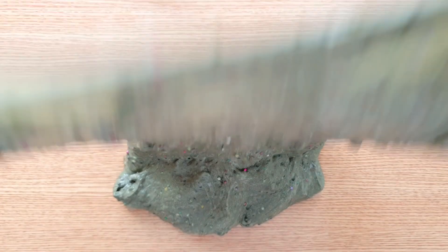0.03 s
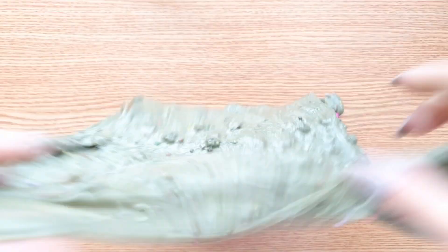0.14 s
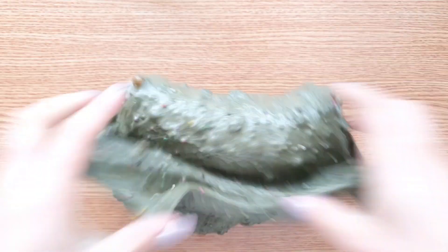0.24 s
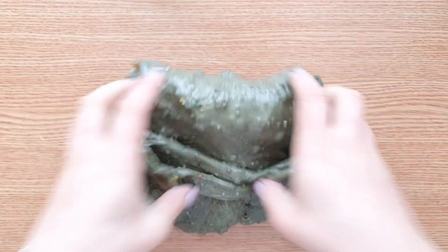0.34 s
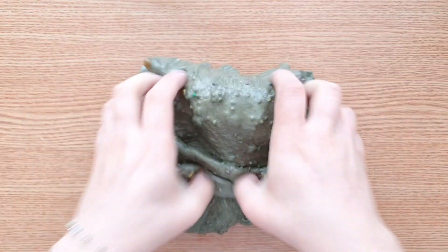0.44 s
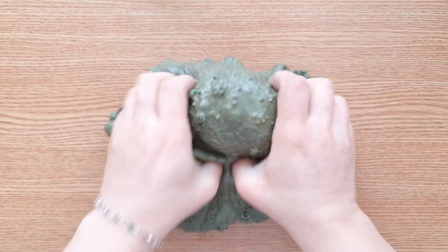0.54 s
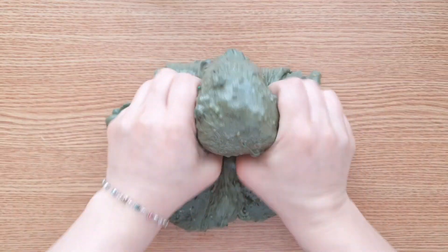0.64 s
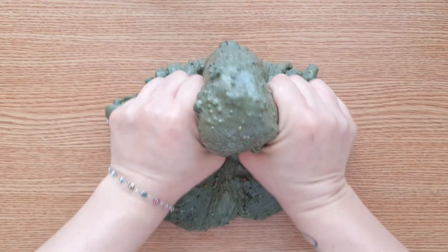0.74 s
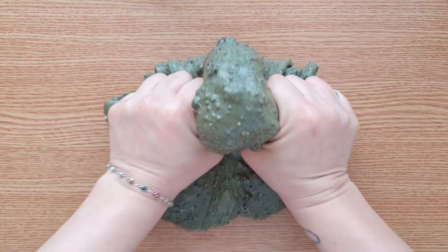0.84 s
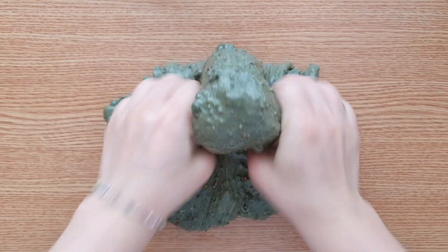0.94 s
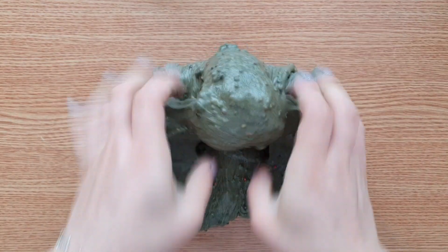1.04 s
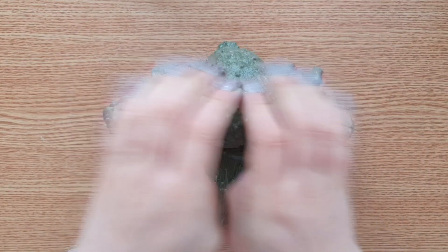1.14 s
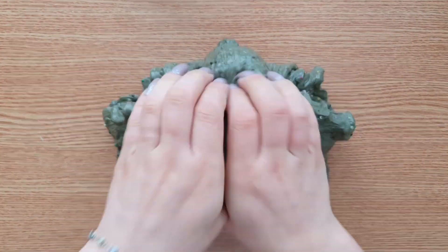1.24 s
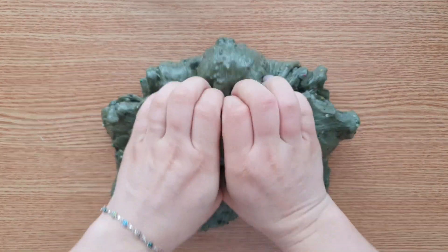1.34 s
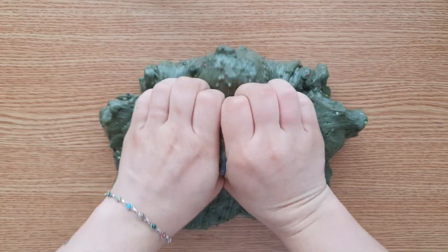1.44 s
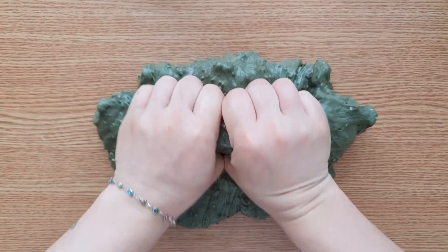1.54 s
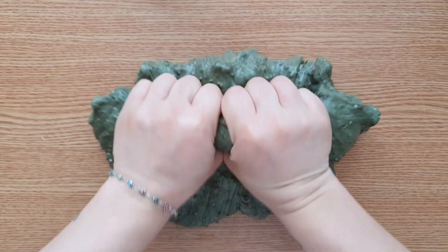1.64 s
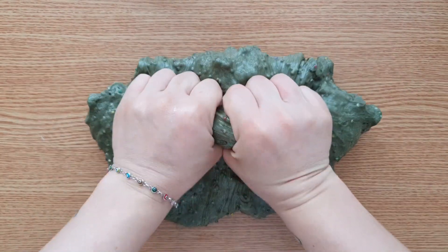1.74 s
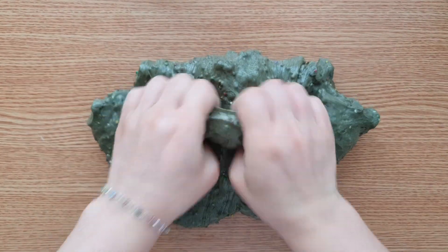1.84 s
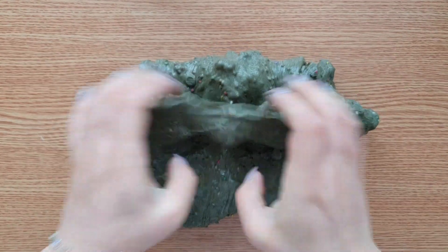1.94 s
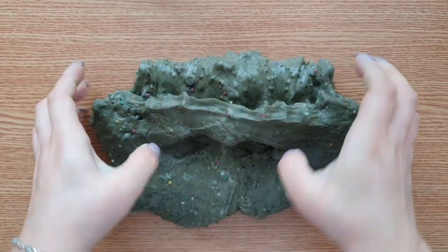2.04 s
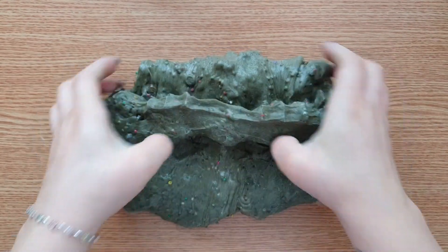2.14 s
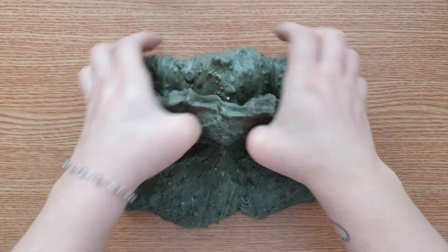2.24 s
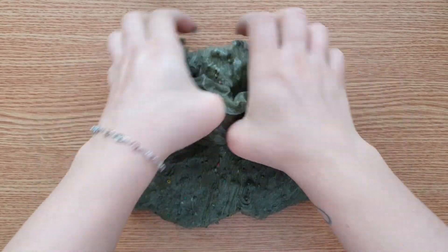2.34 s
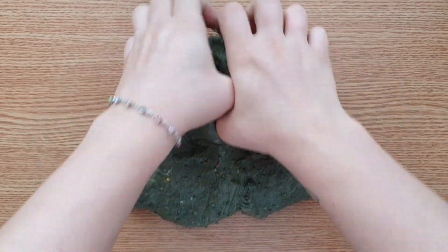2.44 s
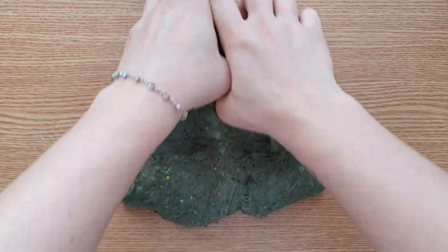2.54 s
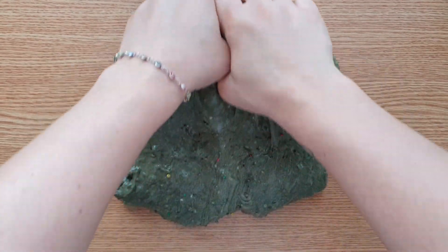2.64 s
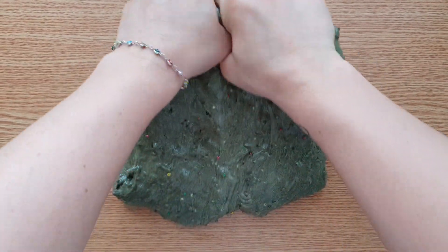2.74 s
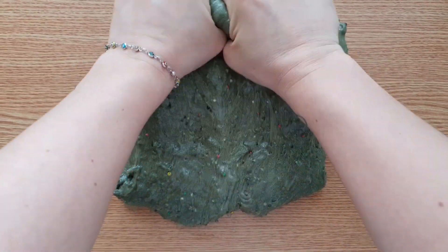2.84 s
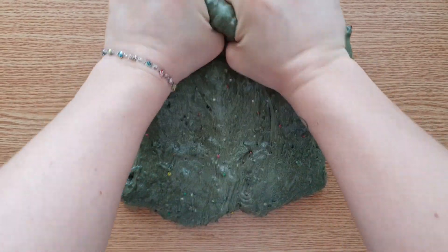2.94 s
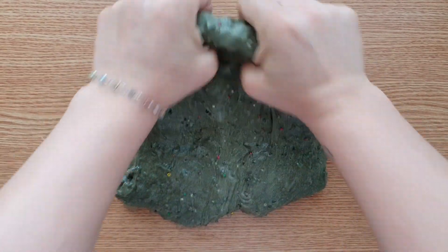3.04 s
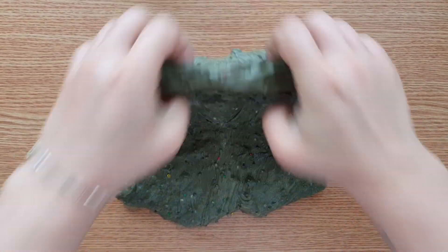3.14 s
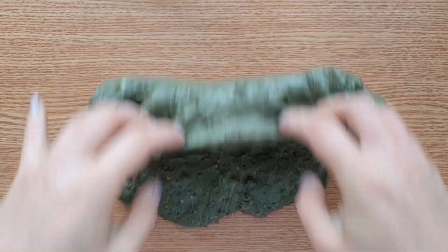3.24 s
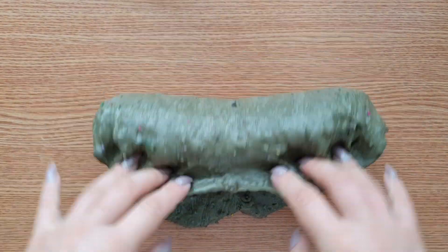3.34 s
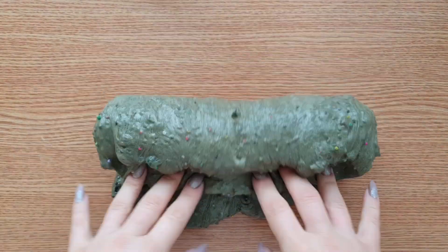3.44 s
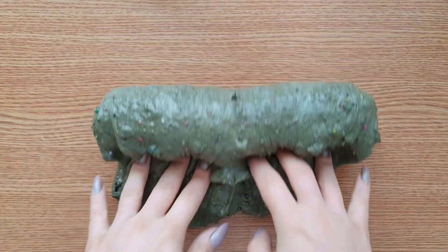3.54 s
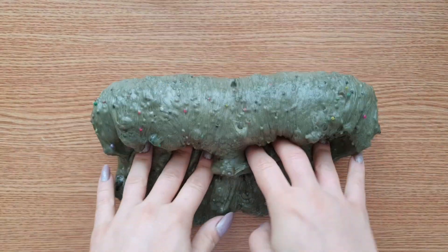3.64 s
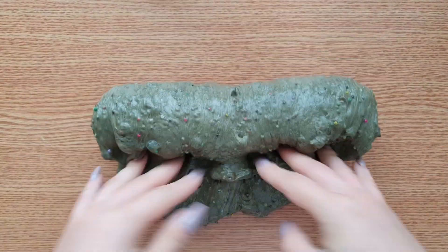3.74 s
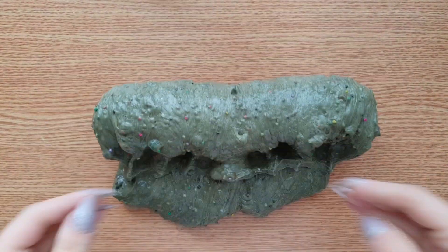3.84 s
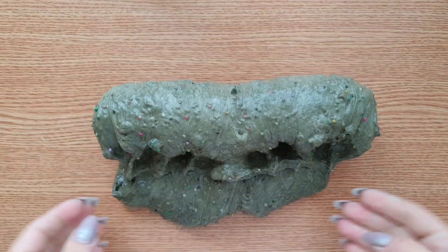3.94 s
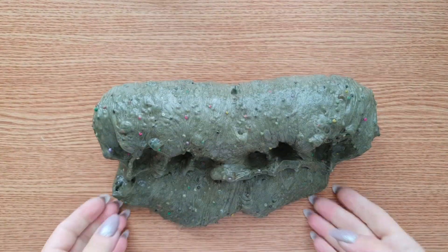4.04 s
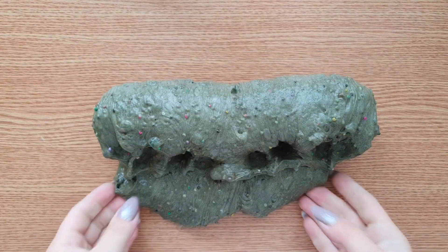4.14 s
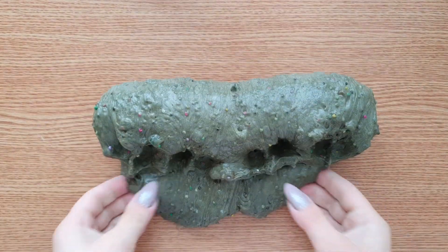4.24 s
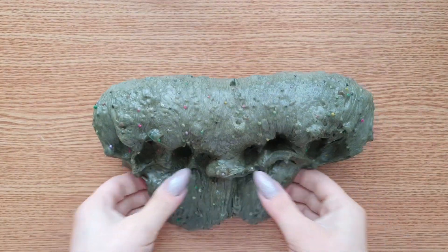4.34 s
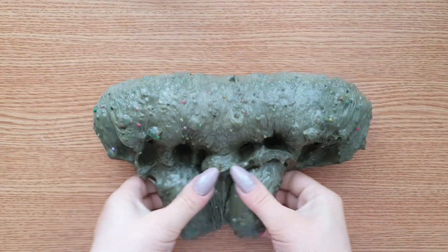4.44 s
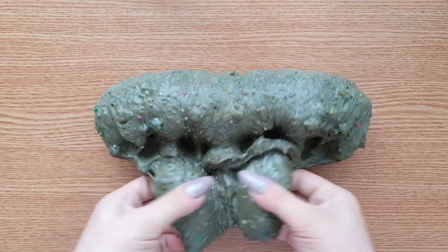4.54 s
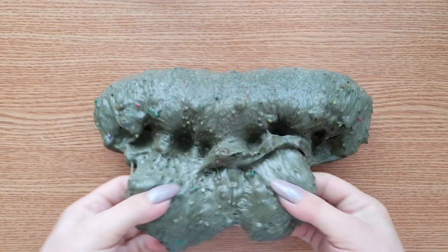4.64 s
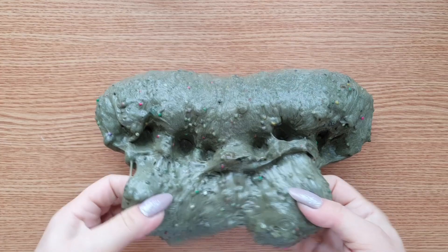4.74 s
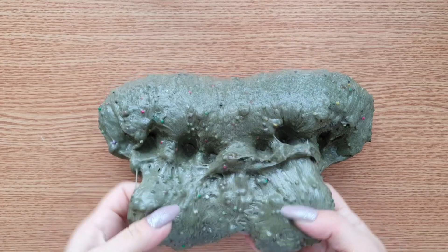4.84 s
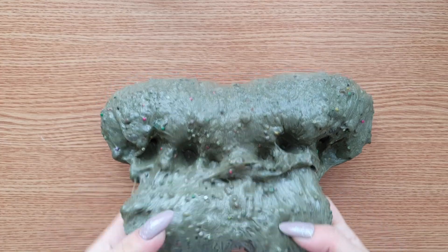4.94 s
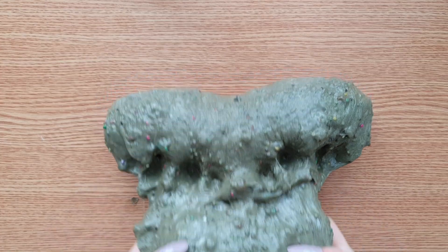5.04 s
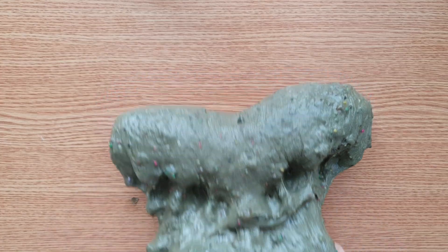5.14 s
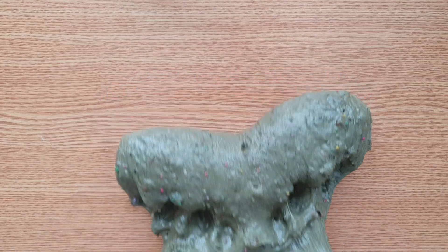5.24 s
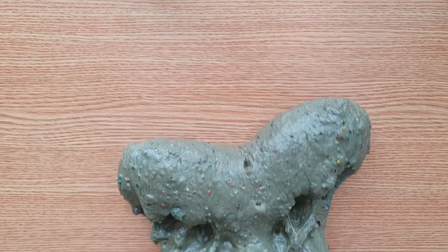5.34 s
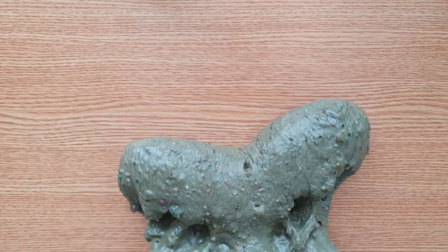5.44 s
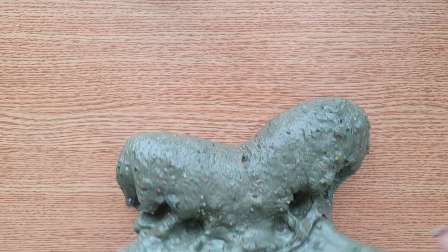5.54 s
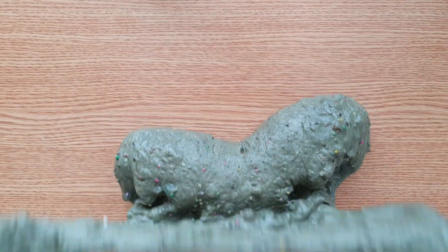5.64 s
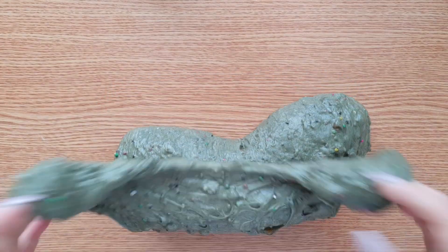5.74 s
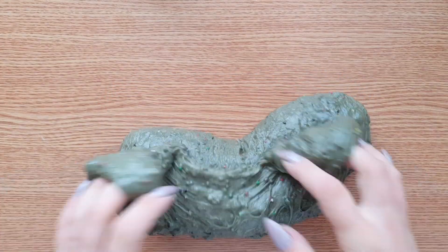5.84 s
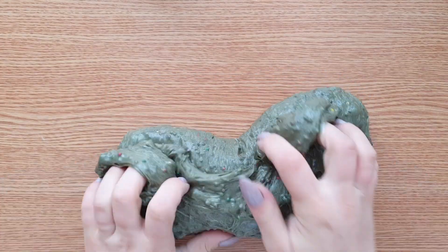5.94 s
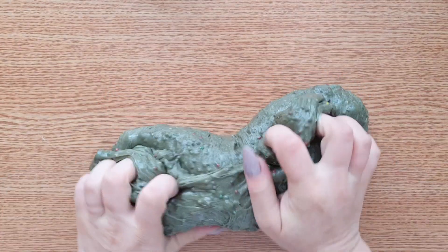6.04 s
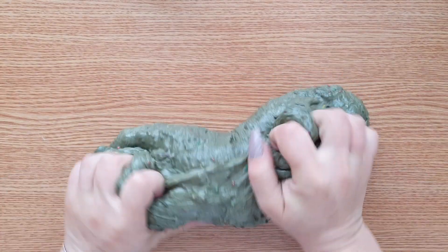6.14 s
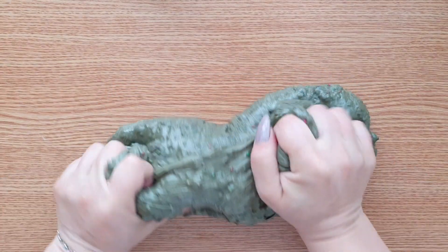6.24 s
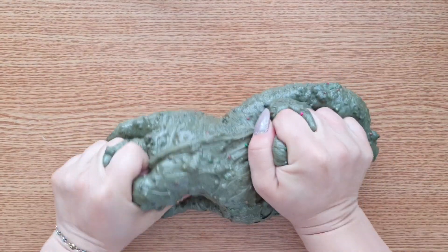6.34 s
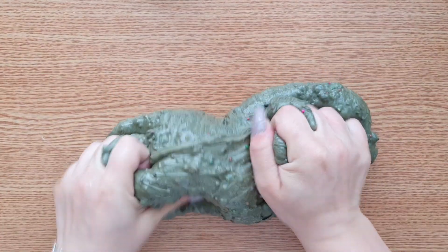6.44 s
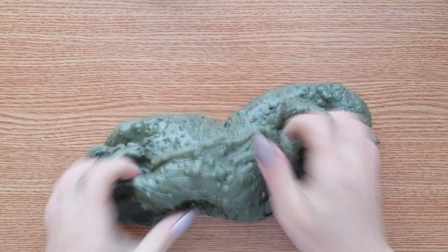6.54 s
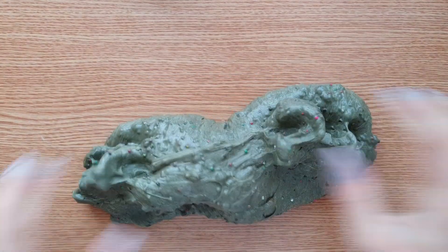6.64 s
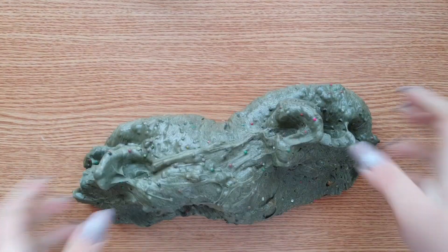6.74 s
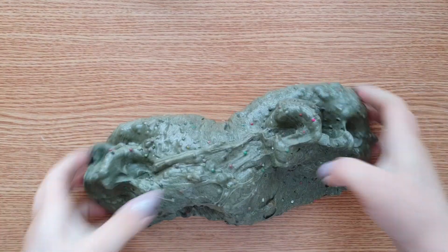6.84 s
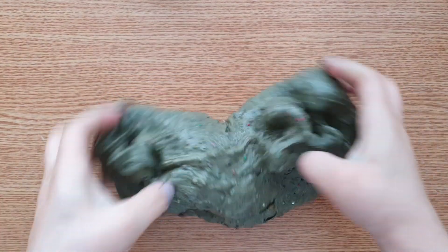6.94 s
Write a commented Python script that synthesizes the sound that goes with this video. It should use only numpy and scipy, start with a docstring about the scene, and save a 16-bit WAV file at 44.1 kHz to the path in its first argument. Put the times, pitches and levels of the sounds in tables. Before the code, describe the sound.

Very close stereo sound of hands squeezing thick beaded slime on a wooden table in a small live room. Crackly squeezes and snaps come first, then one loud, muffled, hollow bubble pop. More crunches and two hard cracks follow, then quieter finger presses, a sticky smacking peel off the table, and a last run of crackling and sharp pops. A faint low hum lies underneath.

```python
"""A low hum stands in a small live room while two hands squeeze bead-filled slime on a wooden table.
Foam crackles as filtered random clicks, pockets gulp as falling chirps and snap as dispersed cracks.
Sticky patches smack, a big bubble bursts with a hollow pop of decaying cavity modes, and the slime
peels off the table in a rasp of many short rings. Echoes, a diffuse tail and room modes follow."""
import sys
import numpy as np
from scipy import signal
from scipy.fft import rfft, irfft
from scipy.io import wavfile

SR = 44100
rng = np.random.default_rng(int(sys.argv[2]) if len(sys.argv) > 2 else 0)


def transcribe(u):
    """Save the signal u as a 16-bit wav file named by the first command-line argument.

    u: samples, shape (n,) or (channels, n), limited to [-1, 1]; the rate is SR.
    q: integer samples, one column per channel.
    """
    v = np.clip(np.atleast_2d(u).T, -1, 1)
    q = np.round(v * 32767).astype(np.int16)
    wavfile.write(sys.argv[1], SR, q)


N = 307818
TIME = np.arange(N) / SR


def from_db(db):
    """Logarithmic level: decibels become an amplitude gain."""
    return 10 ** (np.asarray(db) / 20)


def rms_one(x):
    """Mean-square power: the signal is scaled to unit power."""
    return x / np.sqrt(np.mean(x ** 2) + 1e-20)


def blow(x):
    """Impulse energy: a short sound gets the energy of two milliseconds at unit power."""
    return x / np.sqrt(np.sum(x ** 2) / (.002 * SR) + 1e-20)


def at_hz(points, hz):
    """Spectral interpolation: values are read linearly along a log-frequency axis."""
    points = np.array(points)
    return np.interp(np.log(hz), np.log(points[:, 0]), points[:, 1])


def filtered(x, hz, kind, order=2):
    """Linear filtering: a Butterworth response with a maximally flat passband."""
    sections = signal.butter(order, np.clip(hz, 10, .48 * SR), kind, fs=SR, output="sos")
    return signal.sosfilt(sections, x + 1e-18)


def drift(rate):
    """Slow random modulation: straight lines join `rate` random values per second, at unit power."""
    knots = rng.standard_normal(4000)
    return rms_one(np.interp(TIME * rate, np.arange(len(knots)), knots))


def add(out, s, sound):
    """Superposition: a short sound is summed in at time s."""
    i = max(int(s * SR), 0)
    out[..., i:i + sound.shape[-1]] += sound[..., :N - i]


def ring(hz, t60, length):
    """Damped free oscillation: a sine that falls by 60 dB in t60 seconds."""
    t = np.arange(int(length * SR)) / SR
    return np.sin(2 * np.pi * hz * t) * from_db(-60 * t / t60)


def placed(x, pan_db, lag):
    """Stereo localisation: two ports differ in level (left over right) and arrival time (samples)."""
    padded = np.pad(x, (0, 8))
    return np.array([np.roll(padded, max(side * lag, 0)) * from_db(side * pan_db / 2) for side in (1, -1)])


def stroke(start, swell, hold, fade):
    """Pressure envelope of one hand movement: linear build, hold, exponential decay."""
    t = TIME - start
    build = np.clip(t / max(swell, .001), 0, 1)
    return build * from_db(-60 * np.clip((t - swell - hold) / fade, 0, 3))


def background():
    """Stationary sources: sine partials wavering in level and phase, and spectrally shaped noise."""
    # hum partials: f/Hz, relative level/dB
    hum_partials = [(84.1, -1.5), (41.7, -26), (209.3, -21.5)]
    # the hum swells and sinks: t/s, level/dB
    hum_level = [(0.0, -57.5), (0.99, -50.5), (1.07, -53.5), (2.93, -57), (4.29, -45.5), (4.92, -52),
                 (6.92, -48.5), (6.98, -54)]
    # noise spectrum: f/Hz, relative density/dB per Hz
    noise_spectrum = [(15, -34.5), (25, -15), (64, -5.5), (99, -8), (123, -3.5), (161, -17), (242, -17.5),
                      (394, -35), (659, -40), (2410, -40), (3720, -43.5), (6740, -44), (11600, -57),
                      (16000, -72)]
    noise_db = -62.5
    tones = 0
    for hz, db in hum_partials:
        level = np.sqrt(2) * from_db(db + 0.54 * drift(5))
        tones = tones + level * np.sin(2 * np.pi * hz * TIME + .25 * drift(2.8))
    hz = np.maximum(np.fft.rfftfreq(N, 1 / SR), 1)
    spectrum = rfft(rng.standard_normal((2, N))) * from_db(at_hz(noise_spectrum, hz)) * (hz > 20)
    mid, side = irfft(spectrum, N)
    noise = rms_one(mid + filtered(side, 500, "high", order=1) * [[1], [-1]])
    return tones * from_db(np.interp(TIME, *np.transpose(hum_level))) + from_db(noise_db) * noise


def kneading():
    """Power addition: overlapping squeezes set crackle gain, power-weighted brightness, squelch gain."""
    # squeezes and finger presses: start t/s, swell/s, hold/s, fade to -60 dB/s,
    # nominal crackle level/dB, brightness/dB per octave, nominal low squelch level/dB
    presses = [(0.015, 0.033, 0.03, 0.16, -43.5, 0.2, -56), (0.117, 0.048, 0.032, 0.67, -52.5, 2.5, -70),
               (0.244, 0.014, 0.025, .3, -57.5, -3.5, -50.5), (0.367, 0.07, .19, 1.2, -53, -1, -58),
               (0.66, .05, 0.13, 0.7, -53, -1, -51), (0.88, 0.068, 0.048, 0.16, -35, -.5, -39),
               (1.12, .03, .13, .2, -62, -1, -66), (1.288, 0.013, .15, 0.5, -58, -.5, -61),
               (1.432, 0.032, .01, 0, -51, -2, -54.5), (1.463, 0.0021, 0.0081, 0.32, -38.5, -6.8, -52),
               (1.518, 0.037, .09, 0.06, -49, -1.5, -38.5), (1.748, 0.048, 0.069, .12, -40, -1.5, -43),
               (1.999, 0.003, .065, 0.36, -47.5, -5, -52), (2.147, 0.041, 0.11, .5, -53, 0.5, -57.5),
               (2.47, 0.1, .08, 2.2, -55, -1.3, -65), (2.695, .005, 0.06, 1.1, -50, -1, -61),
               (2.759, .003, .012, .15, -40, 2.5, -55), (2.8, 0.03, 0.07, 0.5, -37.5, -2.6, -53),
               (2.955, 0.068, 0.067, 0.48, -41.5, -1, -45), (3.365, 0.0088, 0.078, 0.6, -63.5, 4, -60),
               (3.51, .015, 0.018, 0.14, -59, -5.5, -57.5), (3.653, 0.046, 0.03, 0.03, -40.5, 1, -40.5),
               (3.951, .02, 0.0088, 0.4, -46, -3.5, -55), (4.018, .03, 0.2, 0.7, -53, -3.5, -57),
               (4.193, 0.057, 0.2, 0.03, -45.5, -1.2, -45.5), (4.441, 0.042, 0.03, 0.8, -42.5, 0.8, -45),
               (4.937, 0.07, 0.11, 2, -60, 3.5, -64), (5.12, 0.0054, 0.11, 0.27, -51.5, -4.5, -54),
               (5.203, .005, 0.06, 0.4, -47, -3.2, -53), (5.3, .1, .08, 1.2, -65, 0, -70),
               (5.477, .004, .005, 0.03, -56, 7, -69.5), (5.869, 0.12, 0.022, 2, -62.5, 3, -68.5),
               (6.03, 0.033, .23, 0.25, -43, -.3, -52), (6.416, 0.058, 0.085, 0.19, -37.5, -.3, -39),
               (6.766, .004, 0.012, 0.6, -42.5, -2, -48.5), (6.78, 0.098, 0.11, 1, -44.5, -0.5, -45)]
    # foam settling between squeezes: crackle level/dB, brightness/dB per octave, squelch level/dB
    settling = (-81, 1.5, -79)
    crackle_power, squelch_power = from_db(settling[0]) ** 2, from_db(settling[2]) ** 2
    bright = crackle_power * settling[1]
    for start, swell, hold, fade, crackle_db, brightness, squelch_db in presses:
        effort = stroke(start, swell, hold, fade) ** 2
        power = effort * from_db(crackle_db) ** 2
        crackle_power = crackle_power + power
        bright = bright + power * brightness
        squelch_power = squelch_power + effort * from_db(squelch_db) ** 2
    return np.sqrt(crackle_power), bright / crackle_power, np.sqrt(squelch_power)


def clicks(per_s, spread_db):
    """Shot noise: random tiny ruptures, mostly small, a few large."""
    sizes = from_db(spread_db * np.minimum(rng.exponential(1, N), 4)) * rng.choice([-1, 1], N)
    return rms_one(sizes * (rng.random(N) < per_s / SR))


def foam(crackle_gain, brightness, squelch_gain, per_s=2600, spread_db=3.5, clump_db=4.0):
    """Band-filtered shot noise: cells collapse in clumps under each hand; large cells squelch low."""
    # foam spectrum at brightness 0: f/Hz, relative density/dB per Hz
    foam_spectrum = [(130, 1.5), (260, 1.5), (500, -1.7), (780, -1.5), (1200, -3.5), (2000, -0.5),
                     (3300, 2.5), (5000, -2.5), (7000, -5.5), (11000, -7.7), (15000, -13.5)]
    # reference bandwidths/Hz turn levels into densities
    crackle, squelch = crackle_gain / np.sqrt(5000), squelch_gain / np.sqrt(900)
    hands = np.array([clicks(per_s, spread_db) * from_db(clump_db * drift(90)) for hand in range(2)])
    out, edges = np.zeros((2, N)), np.geomspace(110, 17000, 16)
    for low, high in zip(edges, edges[1:]):
        hz = np.sqrt(low * high)
        band = filtered(hands, [low, high], "band", order=3)
        # long waves reach both ports alike
        crossing = np.clip(at_hz([(250, 0.87), (700, 0.31), (5000, 0.1)], hz), 0, 1)
        large = at_hz([(500, 1), (1000, 0)], hz)
        octaves = np.log2(np.clip(hz, 1000, 10000) / 3300)
        tilt = from_db(np.clip(brightness, -7, 7) * octaves)
        gain = large * squelch + (1 - large) * crackle * tilt
        density = np.sqrt(high - low) * from_db(at_hz(foam_spectrum, hz))
        out += rms_one(band + crossing * band[::-1]) * gain * density
    return out * from_db([[.9], [-.9]])


def wet_ticks(crackle, count=360, gain_db=-.5, spread_db=14.0, cycles=8.0):
    """Bubble resonance: stray bubbles of every size ring, louder the harder the foam is kneaded."""
    for when, size, strength, side in rng.random((count, 4)):
        s = when * (N - 1) / SR
        hz = 700 * 16 ** size
        gain = crackle[int(s * SR)] * from_db(gain_db + spread_db * (strength ** 2 - .5))
        yield s, gain * blow(ring(hz, cycles / hz, .02)), 10 * (side - .4), -3


def squeaks(room_db=-5):
    """Lightly damped resonance: tight bubbles ring on as brief squeaks."""
    # squeaks: t/s, level/dB, f/Hz, length/s
    tight_bubbles = [(.04, -48, 3050, .045), (.632, -41, 2230, .03), (3.045, -42, 3350, .035),
                     (5.146, -48, 1800, .03), (5.19, -43, 3300, .03), (5.206, -35, 600, .02),
                     (5.208, -35, 1080, .017)]
    for s, db, hz, length in tight_bubbles:
        tone = ring(hz, .3, length)
        yield s, from_db(db) * tone * signal.windows.tukey(len(tone)), 2, room_db


def table_rumble(squelch, gain_db=-16, follows=.9, boom_hz=128):
    """Forced vibration: the table top rumbles under squeezes, and booms when the slime tugs at it."""
    # tugs: start t/s, swell/s, hold/s, fade to -60 dB/s, rumble level/dB, boom level/dB
    table_tugs = [(4.19, .09, .2, .35, -52, -49), (5.212, .01, .06, .2, -56, -47)]
    lag_s = .04  # the table takes the load just after the slime gives
    load = np.interp(TIME - lag_s, TIME, squelch)
    load = from_db(gain_db) * load.max() * (load / load.max()) ** follows
    rumble = rms_one(filtered(rng.standard_normal(N), [38, 75], "band", order=3))
    boom = np.sqrt(2) * np.sin(2 * np.pi * boom_hz * TIME + drift(20)) * from_db(2 * drift(20))
    out = load * rumble
    for *shape, rumble_db, boom_db in table_tugs:
        out = out + stroke(*shape) * (from_db(rumble_db) * rumble + from_db(boom_db) * boom)
    return out


def gulps(swell_cycles=1.3, fall_octaves_per_cycle=.17, gain_db=-2.5, thud_db=-25):
    """Widening resonator: a pocket's wet chirp falls as it opens, over a dull wobble of the slime."""
    # soft gulps of trapped air: t/s, level before gain_db/dB, f at the peak of the swell/Hz
    trapped_air = [(0.2495, -39, 1300), (0.2672, -30, 1750), (0.282, -32, 1050), (0.385, -38, 900),
                   (0.444, -38, 1700), (0.446, -40, 550), (0.613, -37, 2200), (0.6808, -35, 1100),
                   (0.6812, -33, 430), (0.696, -36, 360), (0.72, -31, 350), (0.7458, -24, 2400),
                   (0.811, -27, 1390), (0.8115, -31, 440), (0.925, -34, 370), (0.971, -29, 400),
                   (1.215, -38, 1720), (1.3, -33, 620), (2.8, -20, 1970), (2.8255, -23, 1100),
                   (2.828, -17, 1900), (3.061, -32, 1900), (3.373, -34, 600), (3.673, -31, 267),
                   (3.693, -32, 250), (3.711, -27, 290), (3.727, -34, 520), (3.73, -27, 255),
                   (4.517, -24, 290), (4.521, -24, 560), (5.206, -30, 1130), (6.082, -31, 802),
                   (6.083, -28, 1900), (6.098, -33, 1300), (6.125, -30, 1250), (6.1408, -23, 3100),
                   (6.196, -30, 1500), (6.199, -32, 280), (6.243, -29, 1900), (6.246, -32, 1200),
                   (6.247, -34, 330), (6.262, -32, 2300), (6.464, -32, 300), (6.494, -28, 210),
                   (6.505, -29, 2600), (6.533, -29, 2500)]
    thud_hz, thud_t60_s = 270, .03  # thud_hz is scattered for each gulp
    for s, db, hz in trapped_air:
        age = np.arange(int(.04 * SR)) / SR * hz / swell_cycles  # 1 at the peak of the swell
        pitch = hz * 2 ** (fall_octaves_per_cycle * swell_cycles * (1 - age))
        swell = age * np.exp(.5 * (1 - age ** 2))
        chirp = np.sin(2 * np.pi * np.cumsum(pitch) / SR) * swell
        thud = ring(thud_hz * rng.uniform(.7, 1.4), thud_t60_s, .04)
        yield s, from_db(db + gain_db) * (chirp + from_db(thud_db) * thud), 1, 0


def snaps(tear_db=-4.0, plop_db=-1.5, plop_hz=650, low_edge=.5, high_edge=2.4,
          shreds_db=-11, shreds_s=.003):
    """Impulse-excited resonance: a film's dry crack is coloured by its pocket; shreds crackle after."""
    # snapping pockets: t/s, level/dB, f/Hz, plop re level before plop_db/dB, left re right/dB
    air_pockets = [(0.3398, -46, 11500, -30, 6), (0.3742, -43, 4750, -20, 3), (0.3838, -38.5, 3000, -6, 6),
                   (0.4587, -33, 8340, -20, 6), (0.5733, -42, 5000, -32, 7), (0.6294, -34.5, 2100, -26, 4),
                   (0.639, -32.5, 6540, -22, -4), (0.6895, -36, 9500, -25, 3), (0.6966, -26.5, 6300, -8, 4),
                   (0.7188, -20.5, 7200, -14, 7.5), (0.7228, -30, 10000, -20, 5),
                   (0.7278, -31, 7070, -20, 4), (0.746, -29, 7360, -23, 7.5), (0.7837, -17.5, 6800, -36, 7),
                   (0.7918, -31, 5900, -30, 3), (0.8133, -33, 8850, -25, 3), (1.1352, -41.5, 5800, -23, 7),
                   (1.3012, -45, 2000, 0, 3), (1.4379, -39.5, 2830, -9, 3), (1.4626, -35, 13000, -20, 3),
                   (1.4735, -31, 4000, -20, 2), (1.536, -43, 9000, -20, 3), (1.5585, -40, 7000, -20, 4),
                   (1.57, -40, 5000, -20, 2), (1.5825, -39, 5000, -20, 3), (1.5944, -31.5, 4200, -2, 11.5),
                   (1.5995, -38, 11500, -20, 4), (1.619, -37, 9500, -20, 3), (1.637, -29, 5970, -6, 3),
                   (1.644, -35, 3600, -15, 2), (1.7577, -38, 4460, 2.5, 4), (1.8317, -34, 3720, -15, 1),
                   (2.006, -36.5, 4570, 1, 1), (2.049, -34.5, 3710, -11, -2), (2.3885, -27, 8600, -45, 5),
                   (2.4478, -42, 8500, -30, 5), (2.4783, -40.5, 4360, -20.5, 7), (2.574, -45, 3800, -15, 3),
                   (2.638, -46, 3200, -15, 3), (2.675, -45, 3500, -15, 3), (2.6985, -31, 6000, -8, 3),
                   (2.7605, -34, 2270, -10, 1), (2.768, -36, 3600, -12, 2), (2.7972, -12.5, 7000, -24, 5.5),
                   (2.8254, -15, 7300, -20, 0), (3.063, -35, 3160, -7, 3), (3.124, -41, 7000, -12, 3),
                   (3.374, -45, 1246, 3, 6), (3.9498, -47.5, 2050, -2.5, 4), (3.9666, -37, 3620, -7.5, 8),
                   (4.071, -36.5, 3580, -23, 6), (4.171, -43, 4200, -20, 2), (4.4345, -37, 4400, -20, 2),
                   (4.4696, -33, 3000, -5, 3), (5.1225, -41, 3900, -8, 1), (5.1717, -36.5, 4220, -11, 1),
                   (5.789, -43.5, 6380, -28, 2), (5.965, -43.5, 4820, -25, 7),
                   (5.9999, -45, 3700, -26, 11.5), (6.0245, -41, 9000, -25, 3), (6.0402, -32, 3750, -21, 5),
                   (6.046, -33, 3500, -15, 1), (6.0647, -17, 5000, -16, 0.5), (6.073, -31, 4450, -15, 3),
                   (6.1437, -27.5, 6500, -32, 8), (6.1794, -18, 7800, -27, 15),
                   (6.189, -27, 6840, -21, -10), (6.196, -32, 3800, -5, 1), (6.2251, -21.5, 8350, -15, 2),
                   (6.2685, -33, 10500, -25, 3), (6.284, -20.5, 3700, -28, 0), (6.292, -31, 4000, -20, 2),
                   (6.2965, -34, 3300, -20, 2), (6.3528, -36, 11050, -18, 6), (6.461, -35, 4800, -12, 2),
                   (6.5435, -32, 6000, -15, 3), (6.7684, -38.5, 4060, -10, 2), (6.8753, -37, 3360, 1, 1)]
    tear_s, pocket_q = .00025, 1.6  # how long the tear lingers, how sharp the pocket resonates
    # room send: higher with the hands far from the microphone, lower once they grip the near edge
    far_room_db, near_room_db, grip_near_s = 2.3, -1.5, 5.7
    t = np.arange(int(.02 * SR)) / SR
    r = np.exp(-1 / (tear_s * SR))
    for s, db, hz, plop, pan in air_pockets:
        rip = 1.0 * (t == 0)
        for part_hz in np.minimum(hz * rng.uniform(.6, 1.8, 4), 15000):
            poles = [1, -2 * r * np.cos(2 * np.pi * part_hz / SR), r * r]
            rip = signal.lfilter(poles[::-1], poles, rip)  # all-pass: spreads in time without colouring
        shreds = rng.standard_normal(len(t)) ** 3 * np.exp(-t / shreds_s)
        rip = blow(rip) + from_db(shreds_db) * blow(shreds)
        pocket = signal.lfilter(*signal.iirpeak(hz, pocket_q, fs=SR), rip)
        crack = filtered(pocket + from_db(tear_db) * rip, low_edge * hz, "high")
        crack = filtered(crack, high_edge * hz, "low", order=1)
        body = blow(ring(plop_hz * rng.uniform(.7, 1.4), .005, .02))
        sound = from_db(db) * (blow(crack) + from_db(plop + plop_db) * body)
        yield s, sound, pan, far_room_db if s < grip_near_s else near_room_db


def smacks(cycles=7.0, overtone=1.9, overtone_db=-7, room_db=-2):
    """Sudden release: a sticky patch lets go at once, and the gap behind it rings for a few cycles."""
    # smacks: t/s, level/dB, f/Hz
    sticky_patches = [(0.6298, -25, 2050), (0.7455, -22, 2900), (1.797, -30, 2000), (1.862, -30, 2700),
                      (2.187, -35, 3300), (2.7974, -13, 1900), (2.8256, -13, 1600), (2.843, -24, 1400),
                      (2.861, -24, 1500), (2.93, -27, 3000), (4.2018, -12, 2350), (4.209, -27, 2200),
                      (4.2175, -25, 2450), (4.244, -27, 2400), (4.2924, -12, 1900), (4.309, -28, 2000),
                      (4.3355, -25, 1900), (4.366, -23, 1950), (4.398, -27, 1800), (4.4345, -24, 1750),
                      (4.5203, -22, 1600), (6.2837, -15, 1750)]
    for s, db, hz in sticky_patches:
        gap = ring(hz, cycles / hz, .02)
        gap = gap + from_db(overtone_db) * ring(hz * overtone, cycles / hz, .02)
        yield s, from_db(db) * filtered(gap, [.5 * hz, 2.6 * hz], "band"), 0, room_db


def big_pop(edge_hz=1480, bass_hz=75, crack_db=-10, crack_hz=3400, room_db=7.5, crack_room_db=-3):
    """Cavity resonance: a bubble cracks open under palms that muffle it, and flutters as it empties."""
    # cavity modes: f/Hz, level re burst/dB, t60/s
    cavity_modes = [(1110, -1.3, 0.01), (450, -4, 0.0064), (170, -31.5, 0.012)]
    # flutter after the burst: delay/s, level re burst/dB, f re cavity (ratio)
    flutter_pulses = [(.02, -13, 1.08), (.052, -16, .8), (.088, -19, .7), (.113, -18, .92)]
    burst_s, burst_db = 1.4679, -1
    for delay, level_db, detune in [(0, 0, 1), *flutter_pulses]:
        cavity = sum(from_db(db) * ring(hz * detune, t60, .1) for hz, db, t60 in cavity_modes)
        sound = filtered(filtered(cavity, edge_hz, "low", order=10), bass_hz, "high")
        yield burst_s + delay, from_db(burst_db + level_db) * sound, 2, 0 if delay else room_db
    crack = rng.standard_normal(len(cavity)) * np.exp(-np.arange(len(cavity)) / SR / .002)
    crack = filtered(crack, [edge_hz, crack_hz], "band")
    yield burst_s, from_db(burst_db + crack_db) * crack, 2, crack_room_db


def peel(cycles=16.0, gain_db=-3.0, size_spread_db=22):
    """Serial release of sticky threads: the gap under the slime changes and its pitch falls."""
    # pulls: start t/s, length/s, level before gain_db/dB, first f/Hz, last f/Hz,
    # pitch scatter/octaves, threads per s
    pulls = [(2.05, .035, -46, 900, 600, 1.0, 700), (3.04, .04, -47, 1300, 700, 1.2, 700),
             (4.205, .33, -39.5, 2600, 1400, .8, 500), (4.203, .22, -44, 4000, 3200, .7, 500),
             (4.392, .02, -44, 5200, 4400, .9, 1200), (4.47, .04, -40, 5900, 4600, .6, 1200),
             (4.535, .08, -47, 1400, 900, 1.2, 600), (5.0, .09, -62, 950, 850, 1.1, 700),
             (5.088, .11, -56, 850, 750, 1.1, 700), (5.121, .1, -41.5, 4100, 2950, .5, 2500),
             (5.205, .021, -37, 1000, 900, 1.3, 1500), (5.207, .075, -42, 2200, 1300, 1.5, 800)]
    sag_db = 4  # a pull weakens by this much along its length
    out = np.zeros(N)
    for start, length, db, first_hz, last_hz, scatter, per_s in pulls:
        rasp, count = np.zeros(N), int(per_s * length)
        for k, (jitter, size, detune) in enumerate(rng.random((count, 3))):
            when = (k + jitter) / count
            pitch = first_hz * (last_hz / first_hz) ** when * 2 ** (scatter * (detune - .5))
            thread = ring(pitch, cycles / pitch, .016) * from_db(-size_spread_db * size)
            add(rasp, start + when * length, thread * rng.choice([-1, 1]))
        rasp = filtered(rasp, [last_hz * 2 ** -scatter, first_hz * 2 ** scatter], "band")
        progress = np.clip((TIME - start) / length, 0, 1)
        out += rms_one(rasp) * np.sqrt(length * SR / N) * from_db(db - sag_db * progress)
    return from_db(gain_db) * out * from_db([[1], [-1]])


def room(x, wet_db=-2.5, modes_db=-57, build_s=0.0034):
    """Reverberation by convolution: near echoes, a diffuse tail decaying band by band, standing waves."""
    # standing waves: f/Hz, level before modes_db/dB, t60/s
    standing_waves = [(125, -1, .35), (205, -1, .6), (248, -3, .45), (269, -2, .4), (350, -7, .45),
                      (397, -5, .4), (436, -5, .4), (545, -3, .45), (584, -4, .45), (662, -7, .5),
                      (776, -5, .5), (804, -8, .45), (969, -5, .4), (1006, -5, .4), (1120, -8, .4),
                      (1168, -6, .4)]
    # tail spectrum: f/Hz, density before wet_db/dB per Hz
    tail_spectrum = [(60, -5), (200, -10.5), (500, -1), (800, -2.5), (1200, -3), (2500, -1.6), (7000, -4),
                     (15000, -1)]
    # tail decay: f/Hz, t60/s
    tail_t60 = [(100, .6), (500, 0.33), (1200, 0.5), (4000, 0.28), (8000, 0.46), (15000, .3)]
    # near surfaces: nominal delay/s, level/dB
    near_surfaces = [(.0022, -17), (.005, -16), (.0078, -18)]
    t = np.arange(int(.8 * SR)) / SR
    response, edges = np.zeros((2, len(t))), np.geomspace(60, 18000, 15)
    for low, high in zip(edges, edges[1:]):
        hz = np.sqrt(low * high)
        mid, side = filtered(rng.standard_normal((2, len(t))), [low, high], "band", order=3)
        # correlation between the channels
        alike = at_hz([(150, 0.91), (300, 1.0), (550, 0.49), (1200, .2), (2500, -0.34)], hz)
        alike = np.clip(alike, 0, 1)
        tail = np.sqrt(1 + alike) * mid + np.sqrt(1 - alike) * side * [[1], [-1]]
        tail = tail * from_db(-60 * t / at_hz(tail_t60, hz)) * (1 - np.exp(-t / build_s))
        density = np.sqrt(4 * (high - low) / SR / np.sum(tail ** 2))
        response += tail * density * from_db(wet_db + at_hz(tail_spectrum, hz))
    for hz, db, t60 in standing_waves:
        response += from_db(modes_db + db - 60 * t / t60) * np.sin(2 * np.pi * (hz * t + rng.random()))
    for delay, db in near_surfaces:
        for channel in range(2):
            response[channel, int(delay * rng.uniform(.85, 1.15) * SR)] += from_db(db)
    return signal.fftconvolve(x[None], response, axes=1)[:, :N] * from_db([[.6], [-.6]])


def shifting(reflections):
    """Varying path length: reflections arrive a little earlier or later as the hands move."""
    shift_s, changes_per_s = .00008, 30  # rms shift
    return np.array([np.interp(TIME - shift_s * drift(changes_per_s), TIME, side) for side in reflections])


def scene():
    """Superposition: every burst is placed in stereo and sent to the room with its own level."""
    crackle, brightness, squelch = kneading()
    direct = foam(crackle, brightness, squelch) + peel()
    send = direct.mean(axis=0)
    bursts = [*snaps(), *gulps(), *smacks(), *squeaks(), *big_pop(), *wet_ticks(crackle)]
    for s, sound, pan_db, room_db in bursts:
        add(direct, s, placed(sound, pan_db, lag=int(rng.choice([-1, 1]))))
        add(send, s, sound * from_db(room_db))
    return direct + shifting(room(send)) + table_rumble(squelch) + background()


def record(dry):
    """Band limiting and overload: deep bass is cut, the highest peaks clip, the top is cut."""
    limited = np.clip(filtered(dry, 32, "high", order=4), -1, 1)
    return filtered(limited, 16100, "low", order=24)


dry = scene()
out = record(dry)
transcribe(out)
```